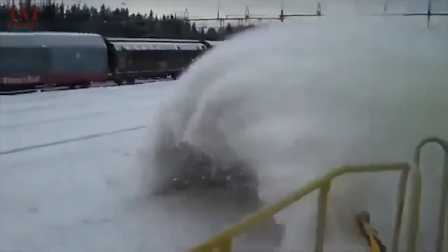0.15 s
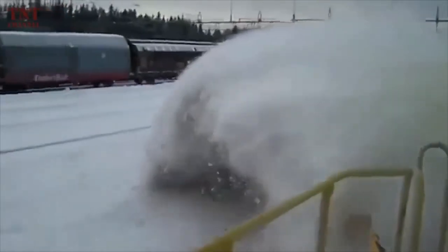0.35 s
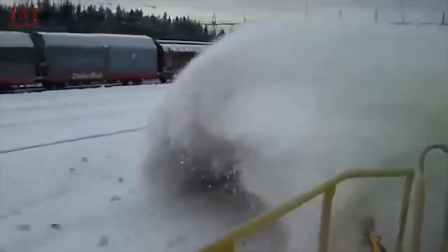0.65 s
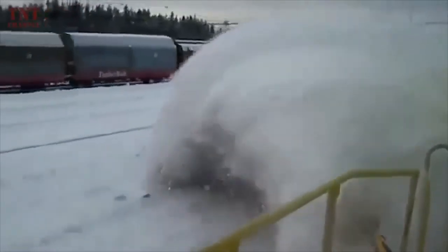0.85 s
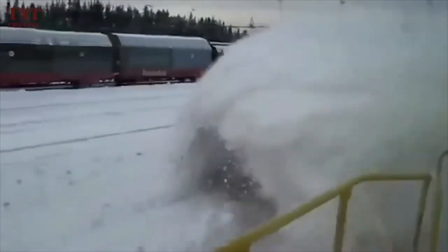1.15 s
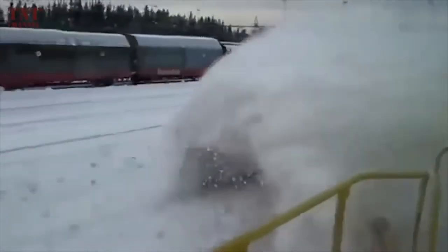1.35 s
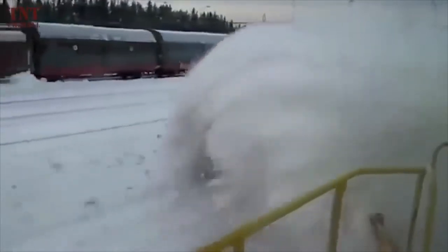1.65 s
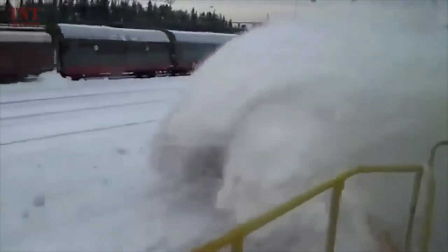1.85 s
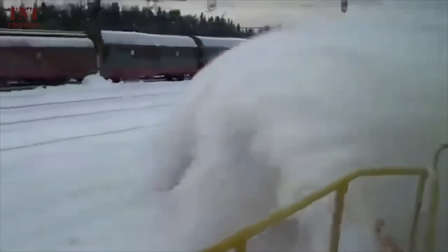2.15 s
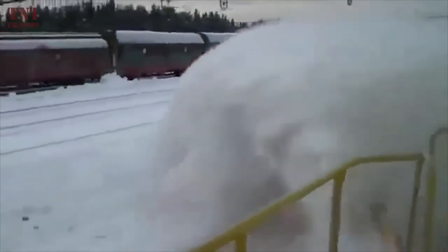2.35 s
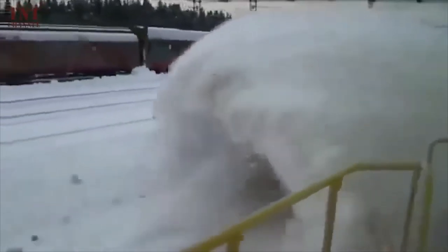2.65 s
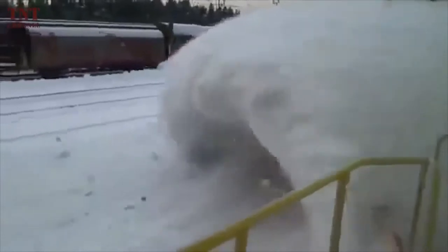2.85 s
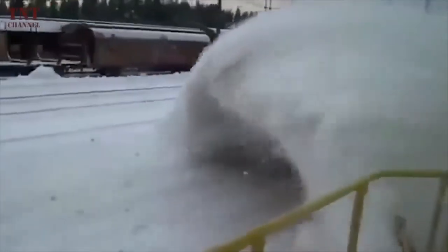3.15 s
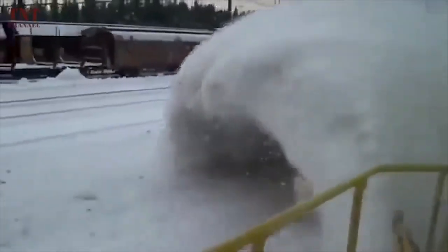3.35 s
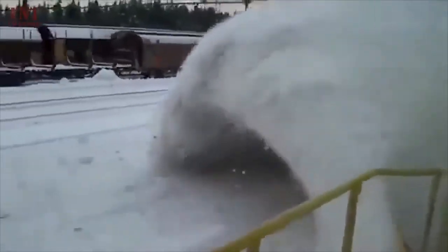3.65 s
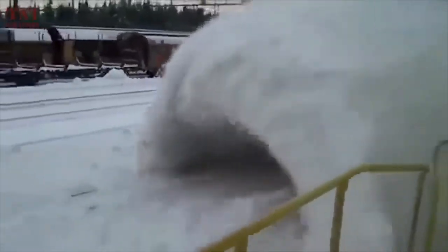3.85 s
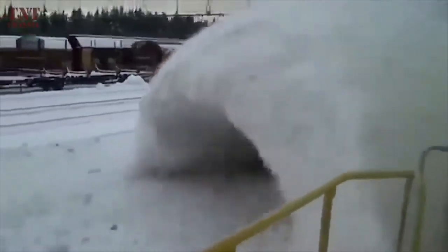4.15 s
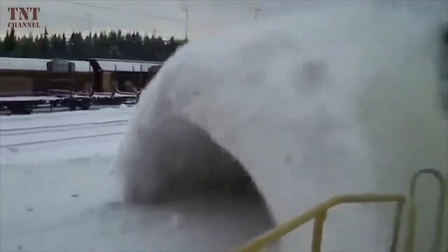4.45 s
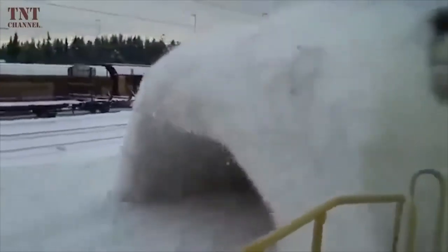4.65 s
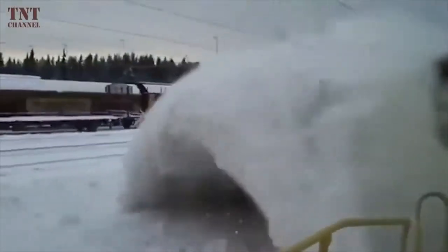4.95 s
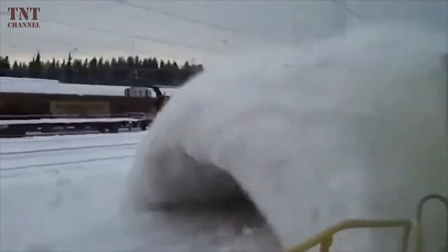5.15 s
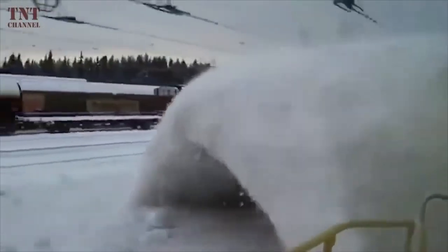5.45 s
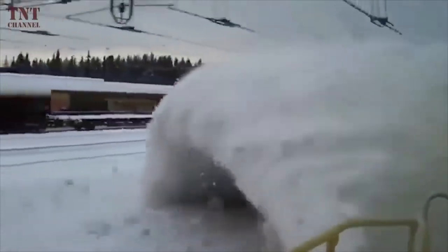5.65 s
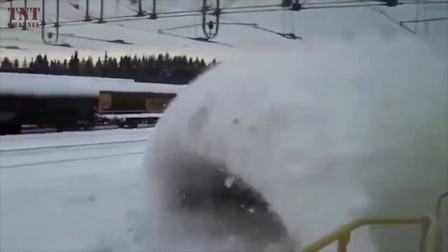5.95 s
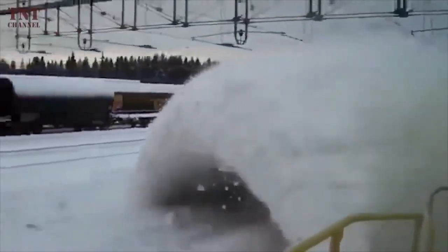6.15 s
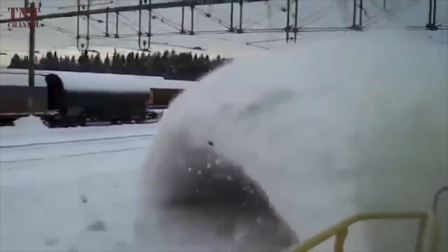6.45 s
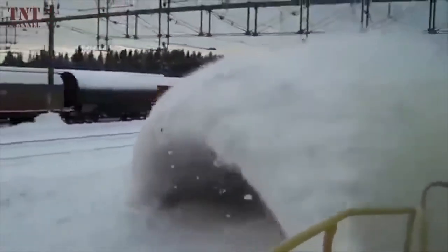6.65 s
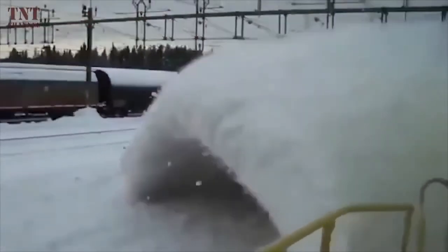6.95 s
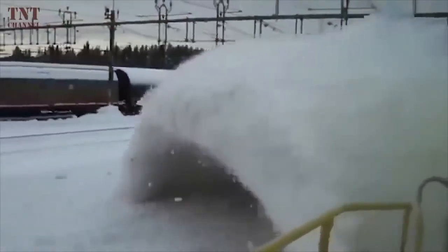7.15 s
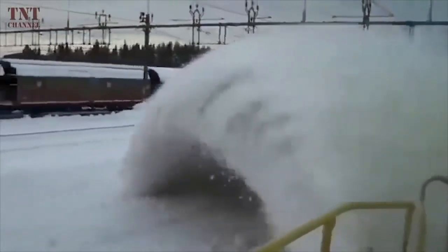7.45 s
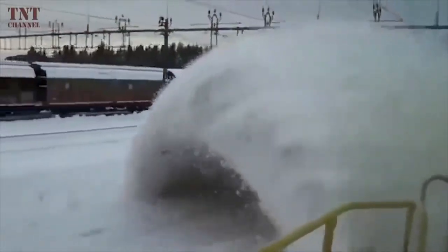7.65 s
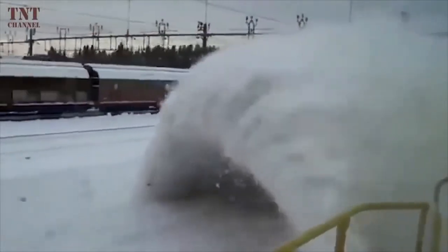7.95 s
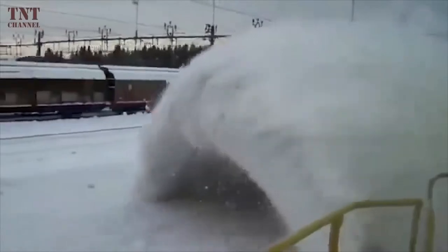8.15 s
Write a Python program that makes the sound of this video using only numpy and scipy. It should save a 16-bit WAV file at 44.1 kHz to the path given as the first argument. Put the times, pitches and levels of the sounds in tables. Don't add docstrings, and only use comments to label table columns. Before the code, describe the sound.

Loud, deep diesel engine throb and drone with roaring thrown snow, loose metal rattling close by, and wind buffets that overload the bass with crackly thumps.

```python
import sys
import numpy as np
from scipy import signal
from scipy.fft import rfft, irfft, next_fast_len
from scipy.io import wavfile

SR = 44100
rng = np.random.default_rng(int(sys.argv[2]) if len(sys.argv) > 2 else 0)


def put_to_file(sound):
    columns = np.atleast_2d(sound).T
    safe = np.clip(columns, -1, 1)
    whole_steps = np.round(safe * 32767)
    wavfile.write(sys.argv[1], SR, whole_steps.astype(np.int16))


def linear_from_db(decibels):
    return 10 ** (np.asarray(decibels, float) / 20)


N = 366030
TIME = np.arange(N) / SR
CYCLE_HZ = 15.1145
BLOWER_RATIO = 2.1152
LEFT_LEAN = linear_from_db(np.array([[0.8], [-0.8]]))

# (time [s], level [dB])
SHUDDER = [(0.0, -54.5), (0.02, -64), (1.29, -54), (1.64, -64), (1.99, -50.5), (2.26, -63), (3.03, -59.5),
           (3.21, -56), (3.28, -67), (3.49, -53.5), (4.69, -60), (4.71, -55.5), (5.15, -65.5), (5.18, -54),
           (6.17, -55), (6.45, -46.5), (6.77, -59), (8.3, -53)]


def rms_one(x):
    return x / np.sqrt(np.mean(x ** 2) + 1e-20)


def in_time(rows):
    s, *columns = np.transpose(rows)
    return [np.interp(TIME, s, c) for c in columns]


def at_hz(points, hz):
    point_hz, value = np.transpose(points)
    return np.interp(np.log(hz), np.log(point_hz), value)


def drift(rate_hz):
    r = np.exp(-80 * np.pi * rate_hz / SR)
    slow = signal.lfilter([1], [1, -2 * r, r * r], rng.standard_normal(N // 40 + 2002))
    slow = slow[2000:]
    return np.interp(np.arange(N) / 40, np.arange(len(slow)), rms_one(slow))


def ring(clicks, hz, t60):
    r, w = linear_from_db(-60 / (t60 * SR)), 2 * np.pi * hz / SR
    return signal.lfilter([0, np.sin(w)], [1, -2 * r * np.cos(w), r * r], clicks + 1e-18)


def rough_noise(spectrum, patchy_db, shared_db):
    # (frequency [Hz], likeness [-1..1])
    likeness = [(60, 0.92), (120, 0.96), (250, 0.98), (510, 0.88), (1040, 0.33), (2110, 0.061),
                (4300, 0.02), (8770, 0.54)]
    # (frequency [Hz], left over right [dB])
    lean = [(60, 4), (160, 2), (440, -1), (1190, 2), (3240, 0.5), (8770, -0.5)]
    size = next_fast_len(N)
    hz = np.maximum(np.arange(size // 2 + 1) * SR / size, 1)
    mid, side = rfft(rng.standard_normal((2, size)))
    alike = np.clip(at_hz(likeness, hz) - 0.2 * (hz > 900), -1, 1)
    pair = np.sqrt(1 + alike) * mid + np.sqrt(1 - alike) * side * [[1], [-1]]
    pair = pair * linear_from_db(at_hz(spectrum, hz) + at_hz(lean, hz) / 2 * [[1], [-1]])
    low_hz, high_hz = spectrum[0][0], spectrum[-1][0]
    place = np.log(hz / low_hz) / np.log(high_hz / low_hz) * 3
    inside = (place > 0) & (place < 3)
    together_db = shared_db * drift(42)
    out = np.zeros((2, N))
    for k in range(4):
        share = inside * np.clip(1 - abs(place - k), 0, 1)
        band = irfft(pair * share, size)[:, :N]
        out += linear_from_db(together_db + patchy_db * drift(15.5)) * band
    return out / np.std(out.mean(axis=0))


def shaft_tones(turns, rows, sway_db, swells=True):
    duct_swells = {4: [(0, 2), (1.15, -3.5), (1.7, 0), (2.4, -4.5), (3, 1), (4.6, 0.5), (6.3, -3.5),
                   (7.4, -1), (8.3, -3)], 7: [(0, -3.5), (1.4, -4.5), (3.1, -5.5), (3.6, 3.5), (4.6, 1.5),
                   (5.5, -2), (8.3, -4.5)], 18: [(0, 5), (1.3, -1), (1.9, -8), (2.5, -3), (3.7, -4.5),
                   (5, -9), (6.2, 2.5), (6.9, 6), (7.5, -1.5)]}
    slip_turns, flutter_db = 0.25, 2.2
    out = np.zeros((2, N))
    for k, left_db, right_db in rows:
        upper = k > 1
        slip = upper * (rng.random() + slip_turns * drift(0.51))
        wave = np.cos(2 * np.pi * (k * turns + slip))
        swell_db = in_time(duct_swells[k])[0] if swells and k in duct_swells else 0
        sway = sway_db * drift(1.0) + upper * flutter_db * drift(9.2)
        out += wave * linear_from_db(swell_db + 4.0 + sway) * linear_from_db(np.array([[left_db], [right_db]]))
    return out


def engine(crank):
    # (crank angle [degrees], strength [dB])
    firings = [
        (-22.5, -29.5),
        (27.5, -22.8),
        (84.8, -23.6),
        (118.9, -32.5),
        (188.4, -25.6),
        (229.3, -22.9),
        (279.7, -20.9),
        (320.3, -25.8),
    ]
    # (frequency [Hz], gain [dB])
    order_strength = [(91, 0), (106, 1.5), (121, -5), (136, 3), (151, 1)]
    # (multiple of the cycle, level [dB])
    body_orders = [(11, -39), (12, -43.5), (13, -43.5), (14, -47.5), (15, -43.5), (16, -44.5), (17, -47),
                   (18, -43.5), (26, -54.5), (31, -51.5)]
    stack_hz, stack_q, stack_low_hz = 55.9, 5.0, 55.8
    degrees, strength_db = np.transpose(firings)
    exhaust = np.zeros(N)
    for k in range(1, 11):
        hz = k * CYCLE_HZ
        pattern = np.sum(linear_from_db(strength_db) * np.exp(-1j * k * np.radians(degrees)))
        resonance = 1 / (1 - (hz / stack_hz) ** 2 + 1j * hz / stack_hz / stack_q)
        order = pattern * resonance * hz / (hz - 1j * stack_low_hz)
        exhaust += linear_from_db(at_hz(order_strength, hz)) * abs(order) * np.cos(2 * np.pi * k * crank + np.angle(order))
    sides = [(k, db + 2.5, db - 0.8) for k, db in body_orders]
    body = shaft_tones(crank, sides, sway_db=0.5, swells=False)
    return linear_from_db(0.5) * exhaust * LEFT_LEAN + body


def fan(crank):
    # (multiple of the shaft, left level [dB], right level [dB])
    blade_tones = [(1, -20.5, -22.5), (2, -39, -39.5), (3, -58.5, -57.5), (4, -39.5, -44),
                   (6, -67.5, -62.5), (7, -44, -47), (8, -53.5, -74), (9, -43.5, -52), (11, -62.5, -57),
                   (12, -53, -72.5), (14, -90.5, -70), (15, -75.5, -58.5), (16, -57, -68.5),
                   (19, -56, -76.5), (20, -67, -83.5)]
    return shaft_tones(6.0762 * crank + 0.41, blade_tones, sway_db=1.2)


def blower(crank):
    # (multiple of the shaft, left level [dB], right level [dB])
    lobe_tones = [(9, -46, -46), (18, -49, -50), (27, -40, -45), (63, -70, -70)]
    return shaft_tones(BLOWER_RATIO * crank, lobe_tones, sway_db=1.0)


def running_gear():
    # (time [s], frequency [Hz], level [dB])
    gear_climb = [(0, 234.4, -42), (1, 241, -31.5), (1.6, 244.1, -39), (1.9, 249, -31), (2.4, 247.6, -36),
                  (3.2, 252.6, -35), (3.7, 250.3, -30), (4.2, 255, -40), (4.8, 253.3, -34),
                  (5.3, 256.2, -30.5), (5.75, 254.5, -31), (6.3, 256.1, -33), (6.9, 255.6, -34.5),
                  (7.5, 259, -37), (7.9, 261, -28.5), (8.3, 262.6, -30)]
    # (frequency [Hz], width [Hz], level [dB])
    frame_modes = [(112.3, 1.1, -28.5), (226.5, 3, -39.5), (923, 6, -51)]
    hz, level_db = in_time(gear_climb)
    turns = np.cumsum(hz + 0.84 * drift(1.06)) / SR
    out = linear_from_db(level_db - 0.5 + 1.9 * drift(5.6)) * np.sin(2 * np.pi * turns)
    for mode_hz, width_hz, db in frame_modes:
        out = out + linear_from_db(db) * rms_one(ring(rng.standard_normal(N), mode_hz, 1.6 / width_hz))
    return out * LEFT_LEAN


def wind():
    # (time [s], strength [dB])
    gusts = [(0.0, -34.5), (0.11, -30.5), (3.23, -12), (3.28, -42), (3.77, -22), (4.0, -31), (5.71, -20),
             (6.1, -30.5), (6.17, -30.5), (6.24, -46), (6.33, -15), (6.89, -27.5), (7.14, -15.5),
             (7.4, -39.5), (8.25, -27.5), (8.3, -20)]
    # (frequency [Hz], density [dB per Hz])
    buffet_colour = [(6, -12), (15, 2), (22, -15.5), (30, -16.5), (40, -42)]
    # (frequency [Hz], density [dB per Hz])
    boom_colour = [(15, -38), (30, -8), (60, 1), (90, -5), (120, -9), (150, -17), (200, -54)]
    gust_db = in_time(gusts)[0]
    boom_db = -25 + 0.4 * (gust_db - gust_db.mean())
    buffet = linear_from_db(gust_db - 8) * rough_noise(buffet_colour, patchy_db=2.5, shared_db=-6.5)
    return buffet + linear_from_db(boom_db) * rough_noise(boom_colour, patchy_db=-1.9, shared_db=0.1)


def thrown_snow():
    # (time [s], level [dB])
    blade_load = [(0.0, -30.5), (0.11, -28.5), (0.16, -29), (1.06, -25.5), (1.73, -29), (1.83, -24.5),
                  (2.75, -27.5), (2.89, -25), (3.23, -27.5), (3.97, -27), (4.23, -28.5), (5.96, -27),
                  (5.99, -29.5), (6.08, -28.5), (6.1, -25.5), (7.3, -30), (8.21, -25), (8.3, -29.5)]
    # (frequency [Hz], density [dB per Hz])
    roar_colour = [(82, -12.5), (140, -10.5), (184, -7), (259, 0), (319, -8.5), (415, -11.5), (605, -10.5),
                   (762, -16.5), (855, -14.5), (1000, -20.5), (1300, -57.5), (2200, -120)]
    # (frequency [Hz], density [dB per Hz])
    rush_colour = [(530, -35), (900, -19), (935, -1), (1210, -4), (1640, -9.5), (1780, -9), (2500, -22),
                   (3250, -65.5), (5500, -120)]
    # (frequency [Hz], density [dB per Hz])
    spray_colour = [(1410, -6), (2400, -3), (5910, -6.5), (6580, -5), (7610, -11), (8430, -16),
                    (8810, -14.5), (9220, -40.5), (12000, -78.5), (20300, -120)]
    roar_db = in_time(blade_load)[0]
    depth_db = roar_db - roar_db.mean()
    shudder_db = in_time(SHUDDER)[0] - np.mean(SHUDDER, axis=0)[1]
    rush_db = 0.6 * depth_db + 0.1 * shudder_db - 47
    spray_db = 0.3 * depth_db + 0.2 * shudder_db - 51.5
    out = linear_from_db(roar_db - 2.5) * rough_noise(roar_colour, patchy_db=1.5, shared_db=-0.5)
    out = out + linear_from_db(rush_db) * rough_noise(rush_colour, patchy_db=0.0, shared_db=2.5)
    return out + linear_from_db(spray_db) * rough_noise(spray_colour, patchy_db=1.33, shared_db=1.5)


def looseness():
    # (time [s], peak level [dB])
    hard_blows = [(0.1042, -39.5), (0.4135, -36), (0.635, -45), (0.827, -43), (0.855, -37), (0.9183, -42.5),
                  (1.1653, -34.5), (1.2301, -38), (1.294, -42.5), (1.7589, -39.5), (1.8238, -39),
                  (1.9175, -37.5), (1.953, -38.5), (2.0173, -40), (3.5463, -38), (3.8287, -40.5),
                  (4.0487, -40), (4.0771, -35.5), (4.1779, -39), (4.2058, -41.5), (4.58, -41.5),
                  (4.7381, -39.5), (4.8015, -40.5), (4.8938, -43), (5.2046, -38.5), (5.2674, -42),
                  (5.3323, -37.5), (5.3951, -39.5), (5.4236, -35.5), (5.5493, -41.5), (5.7049, -37.5),
                  (5.7339, -37), (5.7693, -40), (5.7977, -36.5), (5.8331, -44.5), (5.9554, -36),
                  (6.0182, -34), (6.0811, -38), (6.1449, -44.5), (6.2357, -35.5), (6.3001, -38),
                  (6.3295, -39), (6.3654, -42.5), (6.3934, -35), (6.4298, -31.5), (6.4582, -37.5),
                  (6.987, -40.5), (7.5178, -39), (7.5547, -36), (7.5822, -41), (7.646, -40),
                  (7.7099, -37.5), (7.7393, -34), (7.8017, -34.5), (7.865, -37.5), (7.9548, -37.5),
                  (8.0197, -37), (8.1105, -33), (8.1753, -40), (8.2691, -39)]
    knock_s, knock_trim_db = 0.012, -14.5
    out = linear_from_db(in_time(SHUDDER)[0] - 3.5 + 1.2 * drift(3.2))
    for s, db in hard_blows:
        lift = np.clip(1.5 - abs(TIME - s - 0.005) / knock_s, 0, 1)
        out = np.maximum(out, linear_from_db(db + knock_trim_db) * lift)
    return out


def rattle(crank):
    shakers = [
        (2.1152, .59, 1.),
        (3, .33, .45),
        (2, -.2, .25),
    ]
    # (frequency [Hz], level [dB], t60 [s])
    metal_modes = [(6350, -6, .02), (6500, -7, .02), (6640, 0, .035), (6720, -5, .03), (6860, -9, .05),
                   (7020, -4, .05), (7280, -7, .02), (7400, -9, .025), (5400, -12, .012), (3600, -8, .004),
                   (8980, -17, .04), (9340, -19, .04)]
    shake = sum(weight * np.cos(2 * np.pi * (k * crank + start)) for k, start, weight in shakers)
    crests = signal.argrelmax(shake)[0]
    crests = crests[shake[crests] > 0]
    chance = rng.standard_normal((len(crests), 2))
    late = (chance[:, 0] * 0.0012 * SR).astype(int)
    blows = np.zeros(N)
    blows[np.clip(crests + late, 0, N - 1)] = linear_from_db(6.0 * shake[crests] + 2.0 * chance[:, 1])
    chatter = signal.lfilter([1], [1, -np.exp(-1 / (0.0028 * SR))], blows)
    out = np.zeros((2, N))
    for hz, db, t60 in metal_modes:
        mid, side = chatter * rng.standard_normal((2, N))
        out += linear_from_db(db) * ring(np.array([mid + 1.1 * side, mid - 0.43 * side]), hz, t60)
    return looseness() * out / np.std(out.mean(axis=0))


def overloads():
    # (time [s], depth [dB])
    lone_ducks = [(0.2005, -4), (0.3029, -5), (0.3353, -6.5), (0.4476, -5), (0.869, -6.5), (1.1761, -8),
                  (1.2416, -5.5), (1.6633, -7), (1.9283, -5), (2.1064, -5.5), (2.1936, -7), (2.5227, -6),
                  (2.7455, -5), (2.7632, -7), (2.8471, -8.6), (2.9303, -7), (2.9611, -5), (2.9803, -7.5),
                  (3.0535, -5.5), (3.0827, -4.5), (3.0952, -5), (3.2223, -5.5), (3.5096, -6.5),
                  (3.5682, -5.5), (3.6043, -6.5), (3.6897, -7.7), (3.7809, -7), (3.8411, -6),
                  (3.8952, -9.5), (3.9134, -7), (4.0453, -6), (4.0866, -5.7), (4.1053, -8.5),
                  (4.1897, -5.5), (4.236, -6.7), (5.2, -9), (5.2296, -6), (5.4296, -7.5), (5.6087, -6.5),
                  (5.7278, -7), (5.9386, -6.5), (5.9646, -5.5), (6.03, -5.3), (6.2047, -9.5), (6.3225, -7),
                  (6.3613, -6), (6.6867, -6), (6.7524, -7), (6.8897, -6), (7.7145, -5), (7.9778, -4.5),
                  (8.0151, -5), (8.0617, -5.5), (8.207, -6.5), (8.2549, -6), (8.2739, -6.5)]
    # (first time [s], mean depth [dB], count [cycles])
    duck_runs = [(.532, -5.5, 2), (.7312, -7.5, 2), (1.3264, -5.7, 5), (1.7228, -6, 2), (2.253, -7.5, 2),
                 (2.655, -3.5, 2), (3.1138, -5.6, 4), (4.9655, -6, 3), (5.5617, -4.5, 2), (5.8259, -6.8, 2),
                 (6.4938, -5.6, 3), (7.8096, -8, 2)]
    deepens_db = 1.5
    runs = []
    for s, db, cycles in duck_runs:
        for k in range(cycles):
            deeper_db = deepens_db * (k - (cycles - 1) / 2) / cycles * 2
            runs.append((s + k / CYCLE_HZ, db - deeper_db))
    return np.transpose(list(lone_ducks) + runs)


def surges(bass):
    surge_s, surge_top = 0.008, 0.78
    at = (overloads()[0] * SR).astype(int) - 70
    pushes = np.zeros(N)
    pushes[at] = surge_top * np.sign(bass[at]) - bass[at]
    return signal.fftconvolve(pushes, np.hanning(round(surge_s * SR)), "same") * LEFT_LEAN


def clods():
    # (time [s], level [dB], frequency [Hz])
    scrapes = [
        (1.173, -37.5, 1158),
        (1.194, -23.5, 1476),
        (1.2033, -30.5, 1047),
        (1.2382, -35.5, 1167),
        (4.2108, -26.5, 1440),
        (7.103, -31, 1480),
    ]
    out, span = np.zeros((2, N)), np.arange(SR // 8)
    for s, db, hz in scrapes:
        swell = np.exp(-((span / SR - 0.05) / 0.02) ** 2)
        burst = swell * rng.standard_normal((2, len(span)))
        out[:, span + int((s - 0.038) * SR)] += linear_from_db(db - 23) * ring(burst, hz, 0.01)
    return out


def scene():
    # (time [s], gain [dB])
    gain_opens = [(0, -4.5), (.15, -2), (.4, -0.5), (1, 0), (1.6, -1.5), (2.2, 1.5), (2.8, 0), (3.4, -1),
                  (3.9, 1.5), (4.3, -1), (4.8, 0.5), (5.2, -1), (5.7, 0), (6.3, 1.5), (6.8, -2),
                  (7.3, -1.5), (7.8, 0), (8.3, 1.5)]
    crank = CYCLE_HZ * TIME
    machinery = engine(crank) + fan(crank) + blower(crank) + running_gear() + clods()
    bass = linear_from_db(in_time(gain_opens)[0]) * machinery + wind()
    return bass + surges(bass.mean(axis=0)) + thrown_snow() + rattle(crank)


def limiter_gain():
    swing_hz, damping, release_s = 870, 0.52, 0.005
    s, depth_db = overloads()
    steps = np.zeros(N)
    steps[((s - 0.0002) * SR).astype(int)] = 0.8 * depth_db - 0.6
    w, back = 2 * np.pi * swing_hz / SR, np.exp(-1 / (release_s * SR))
    swing = [1, -2 * np.exp(-damping * w) * np.cos(w), np.exp(-2 * damping * w)]
    drop = signal.lfilter(sum(swing) * np.ones(9) / 9, swing, steps)
    return linear_from_db(signal.lfilter([1], [1, -back], drop))


def roll_off(x):
    return signal.sosfilt(signal.butter(12, 15100, fs=SR, output="sos"), x)


def record(dry):
    ceiling, knee = np.array([[0.585], [0.55]]), 9.0
    bass = signal.sosfiltfilt(signal.butter(2, 350, fs=SR, output="sos"), dry)
    gain = limiter_gain()
    held = gain * bass / (1 + np.abs(bass / ceiling) ** knee) ** (1 / knee)
    out = held + gain ** 0.25 * (dry - bass)
    mic_top_hz, hiss_db = 9550, -86
    out = signal.sosfilt(signal.cheby2(10, 40, mic_top_hz + 250, fs=SR, output="sos"), out)
    out = out + linear_from_db(hiss_db) * rng.standard_normal(out.shape)
    return roll_off(out - out.mean(axis=1, keepdims=True))


dry = scene()
out = record(dry)
put_to_file(out)
```